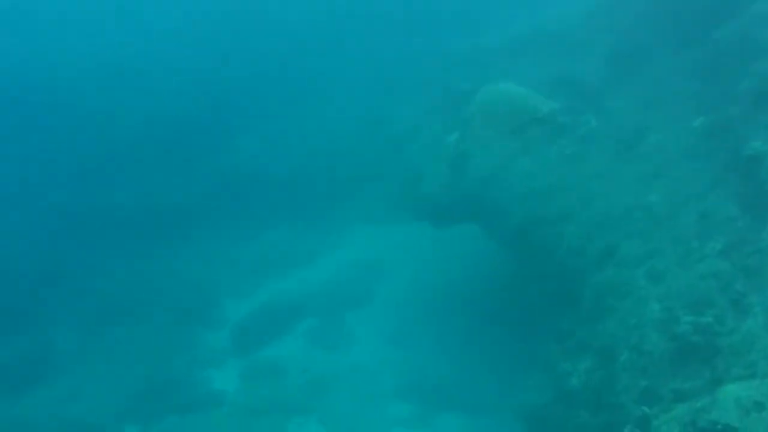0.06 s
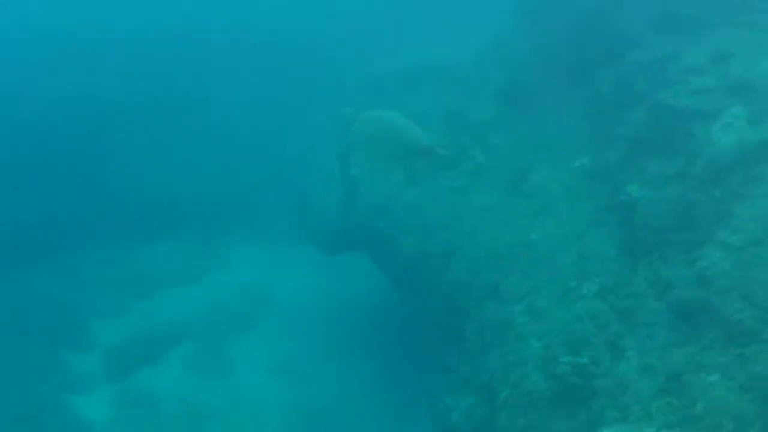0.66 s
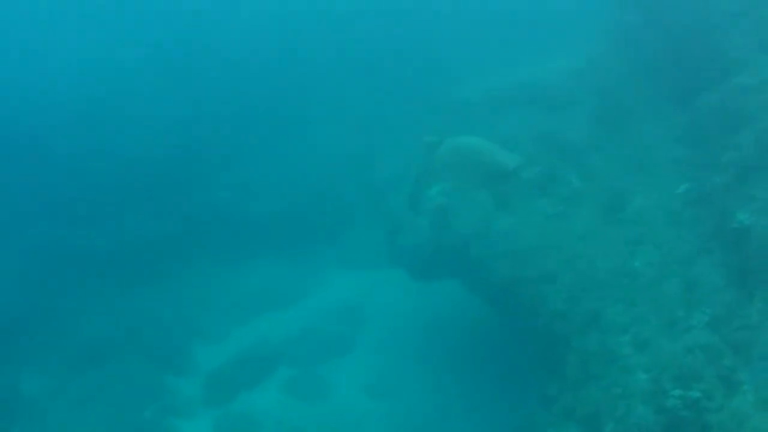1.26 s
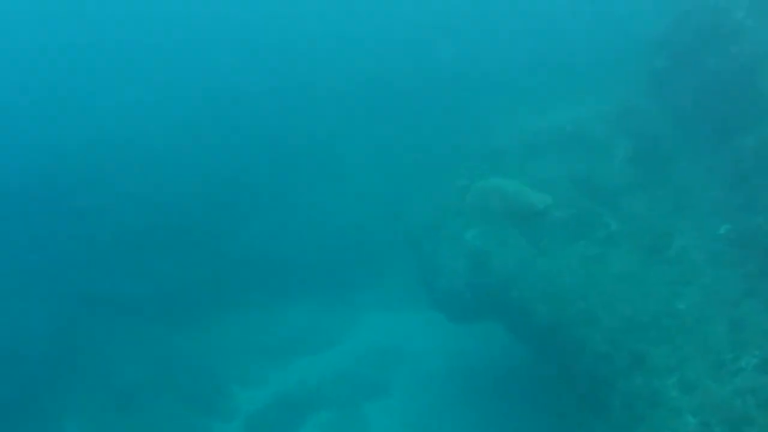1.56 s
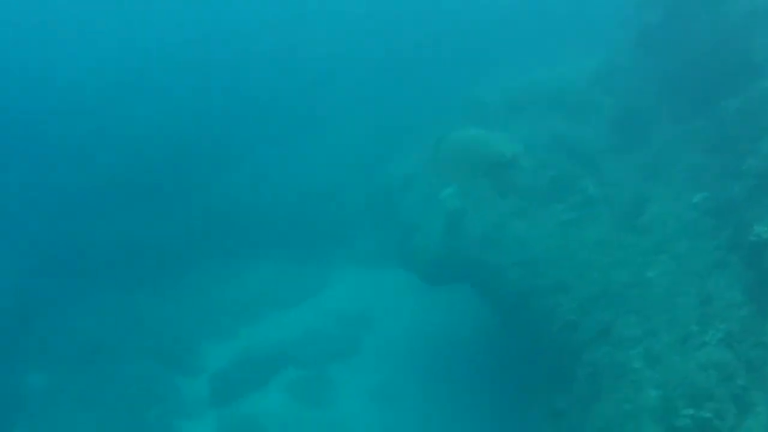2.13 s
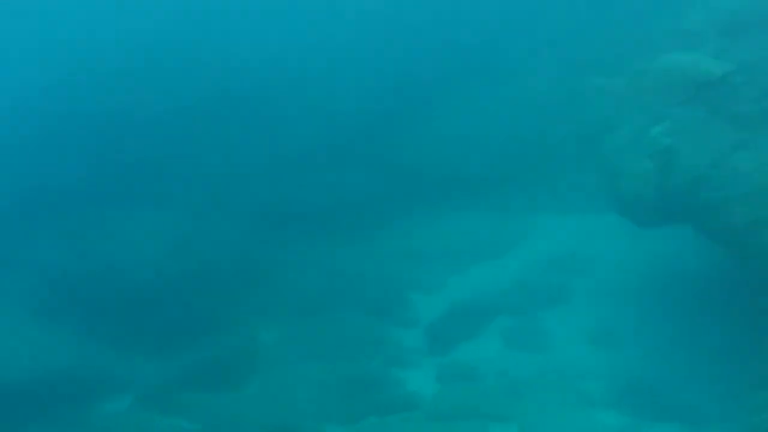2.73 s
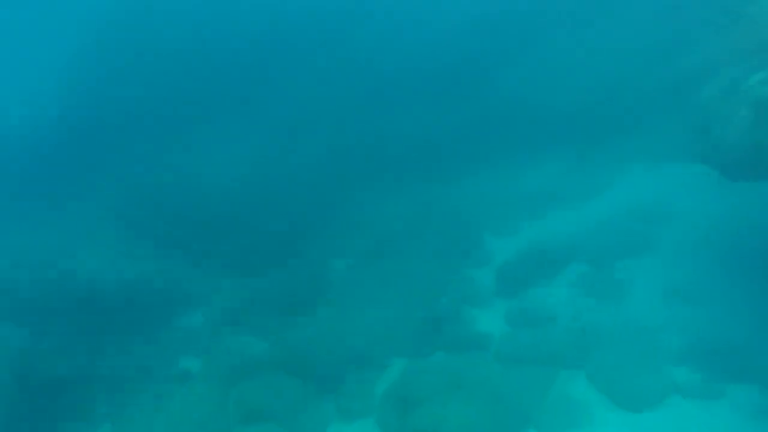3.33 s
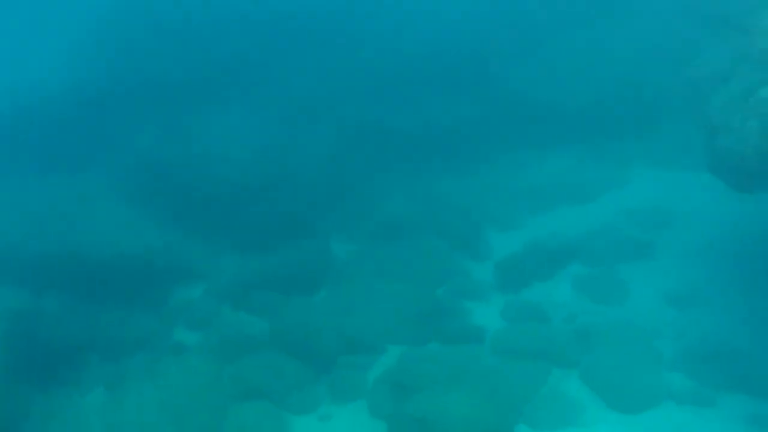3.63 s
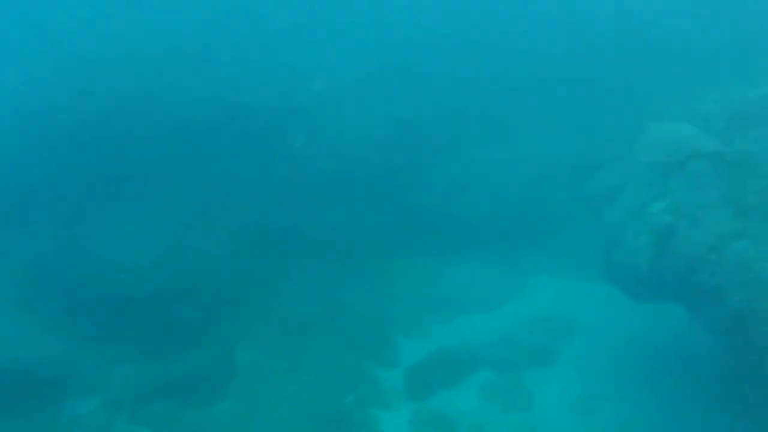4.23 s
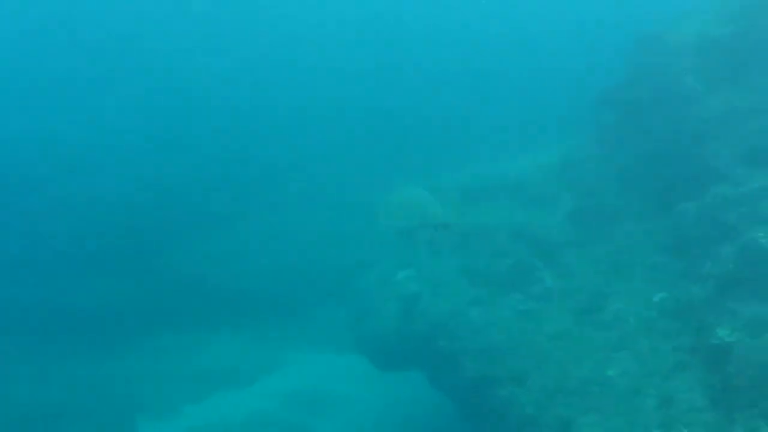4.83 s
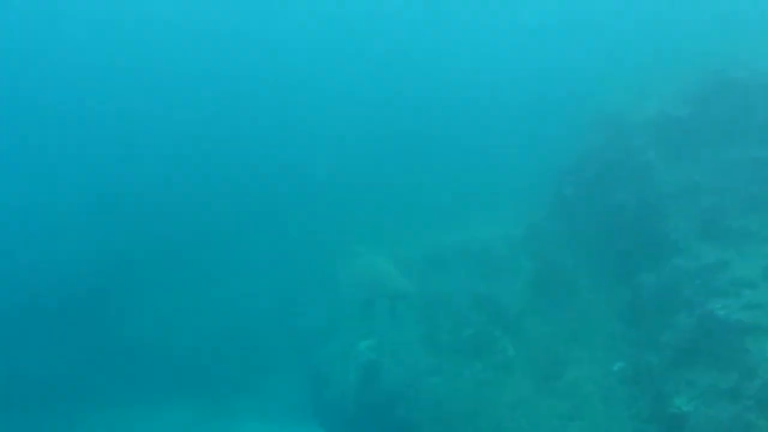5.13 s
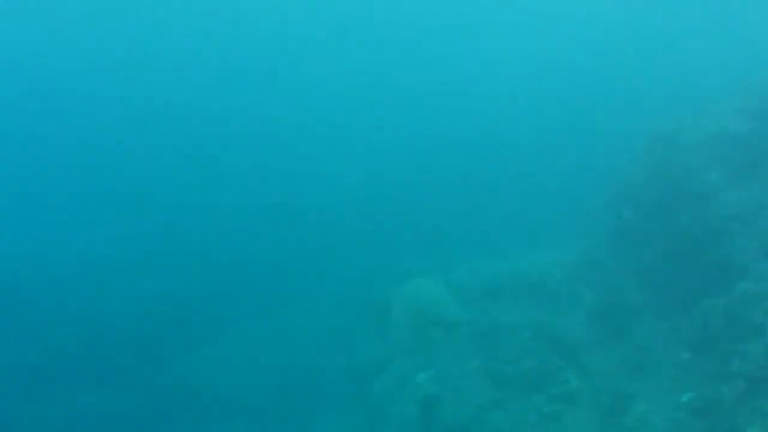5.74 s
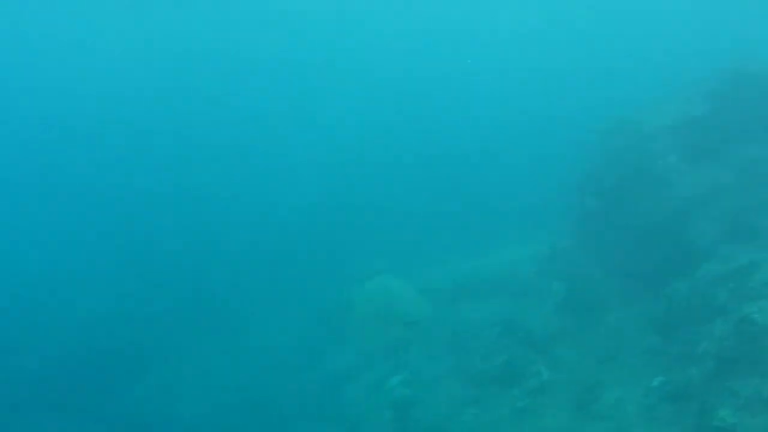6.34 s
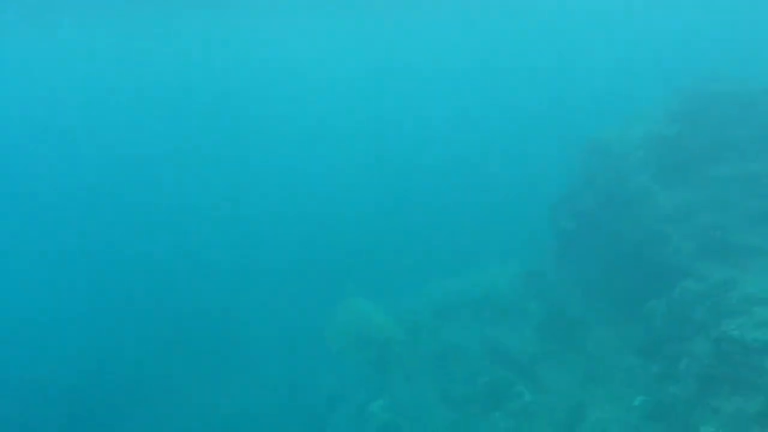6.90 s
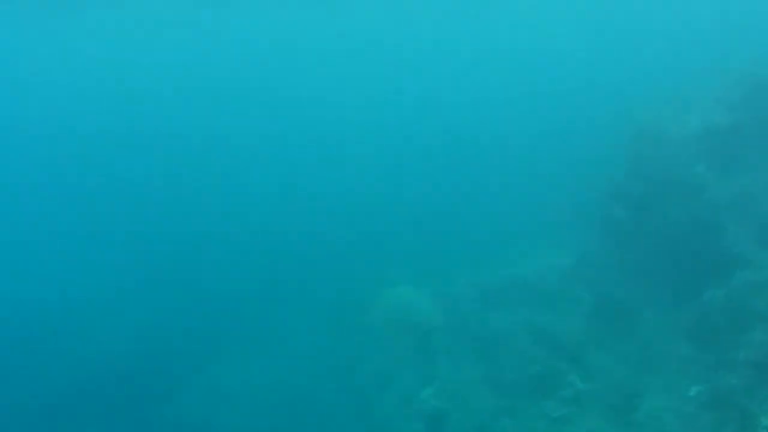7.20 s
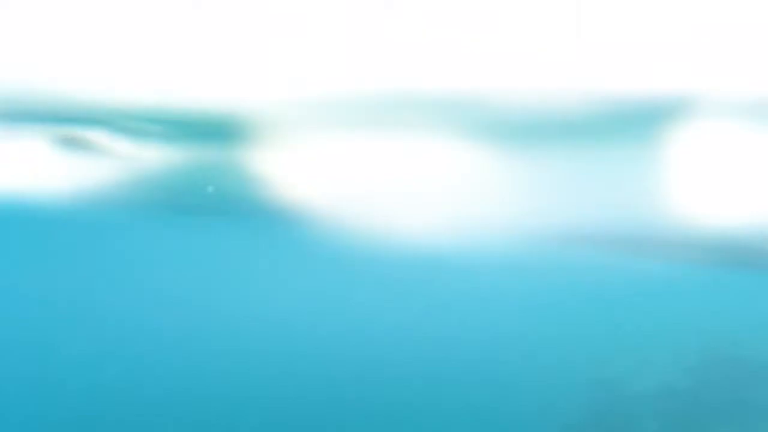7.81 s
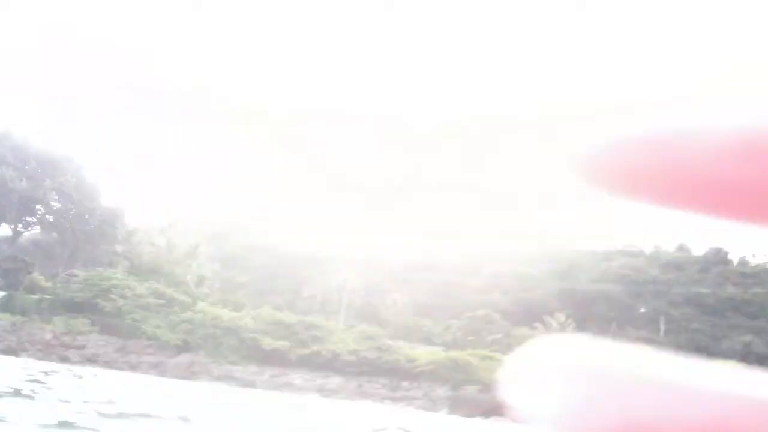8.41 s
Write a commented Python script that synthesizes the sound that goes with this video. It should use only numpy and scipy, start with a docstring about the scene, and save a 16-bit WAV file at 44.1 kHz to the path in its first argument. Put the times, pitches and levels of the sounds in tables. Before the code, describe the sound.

Quiet shrimp clicks, watery hiss and small gurgles on a reef, ending in a few sharp, hollow knocks and splashes at the surface.

```python
"""A camera in a waterproof case drifts over a reef. Snapping shrimp crackle near and far, their clicks
smeared by rock and ringing in the case; water rumbles and swirls past, bubbles blip, air pockets glug.
From 2.3 s water knocks on the case now and then. Near 7.8 s it rises through the surface: the crackle
fades, waves slap the case, water gulps around it and drops tick on it."""
import sys
import numpy as np
from scipy import signal
from scipy.fft import rfft, irfft
from scipy.io import wavfile

SR = 44100
rng = np.random.default_rng(int(sys.argv[2]) if len(sys.argv) > 2 else 0)


def inscribe(sig):
    """Save sig as 16-bit PCM at rate SR to the path in sys.argv[1].

    A 1-D sig is mono; a 2-D sig holds one channel per row.
    Samples are clipped to [-1, 1] before scaling.
    """
    pcm = np.round(np.clip(np.atleast_2d(sig).T, -1, 1) * 32767)
    wavfile.write(sys.argv[1], SR, pcm.astype(np.int16))


N = 381906
HIT_SAMPLES = 4096
RISE_FROM_S, RISE_TO_S = 7.76, 7.95   # the case breaks the surface

# hollow ring of the case: freq_hz, level_db
CASE_SPECTRUM = [(60, -45), (350, -14.5), (800, -2), (1150, -5.5), (1600, 4), (1920, 4), (2400, -17.5),
                 (2950, -13), (3600, -34.5), (6000, -38), (16000, -96)]


def from_db(db):
    """Decibels to gain."""
    return 10 ** (np.asarray(db) / 20)


def rms_one(x):
    """Scale to rms 1."""
    return x / np.sqrt(np.mean(x ** 2) + 1e-20)


def in_time(rows):
    """Each column after time_s, interpolated per sample."""
    time_s, *columns = np.transpose(rows)
    return [np.interp(np.arange(N) / SR, time_s, column) for column in columns]


def add(out, start_s, sound):
    """Mix a sound in at start_s."""
    i = int(np.clip(start_s * SR, 0, N - 1))
    out[i:i + len(sound)] += sound[:N - i]


def wander(count):
    """Glide through count random values over the scene."""
    return np.interp(np.linspace(0, count - 1, N), np.arange(count), rng.standard_normal(count))


def coloured(x, spectrum, vary_db=0):
    """Minimum-phase filter, spectrum points jittered by vary_db; output rms 1."""
    size = 2 * HIT_SAMPLES
    hz, db = np.transpose(spectrum)
    db = db + vary_db * rng.standard_normal(len(db))
    shape_db = np.interp(np.log(np.arange(size // 2 + 1) * SR / size + 1), np.log(hz), db)
    cepstrum = irfft(np.log(from_db(shape_db)))
    cepstrum[1:size // 2] *= 2
    cepstrum[size // 2 + 1:] = 0
    response = irfft(np.exp(rfft(cepstrum)))[:HIT_SAMPLES]
    return rms_one(signal.oaconvolve(x, response)[:len(x)])


def noise(spectrum):
    """Steady coloured noise, rms 1."""
    return coloured(rng.standard_normal(N), spectrum)


def swelling(swell_s):
    """Envelope: peaks at 1 after swell_s, then decays."""
    age = np.arange(2 * HIT_SAMPLES) / SR / swell_s
    return age * np.exp(1 - age)


def briefer(level_db, halving_db, gentle_db=-40):
    """Length factor, 1 at gentle_db: violent motion is spent sooner."""
    return 2 ** ((gentle_db - level_db) / halving_db)


def scattered(clicks):
    """Rough rock smears each click over about 1 ms, rippling its spectrum."""
    smear = swelling(swell_s=0.00022)[:HIT_SAMPLES // 32]
    return signal.lfilter(smear * rng.standard_normal(len(smear)), 1, clicks)


def far_shrimp(per_s, spread_db, surge_db, paths=6):
    """Distant snaps arrive along differently coloured paths and merge into a surging, frying hiss."""
    # distant crackle: freq_hz, level_db
    far_spectrum = [(530, -26), (900, -2), (1290, -5.5), (1590, 5), (1850, 0), (2000, -1.5), (2360, -15),
                    (3000, -7), (3590, -11), (4740, 1), (7060, 0.5), (8980, -5.5), (12400, -19.5),
                    (14500, -26), (16000, -72.5)]
    sizes = from_db(spread_db * np.minimum(rng.exponential(1, N), 4)) * rng.choice([-1, 1], N)
    clicks = sizes * (rng.random(N) < per_s / SR)
    path = rng.integers(0, paths, N)
    crackle = sum(coloured(scattered(clicks * (path == k)), far_spectrum) for k in range(paths))
    hiss = from_db(-1) * noise(far_spectrum)
    return rms_one((rms_one(crackle) + hiss) * from_db(surge_db * wander(count=400)))


def pulse(rattle_db, rattle_t60_s, echo_db, echo_t60_s):
    """Pressure spike, its rattle in the case, and scattered echoes from rock and surface."""
    t = np.arange(HIT_SAMPLES) / SR
    rattle = rng.standard_normal(HIT_SAMPLES) * from_db(-60 * t / rattle_t60_s)
    echoes = rng.standard_normal(HIT_SAMPLES) * rng.exponential(1, HIT_SAMPLES)
    echoes *= from_db(-60 * t / echo_t60_s)
    tail = from_db(rattle_db) * rms_one(rattle) + from_db(echo_db) * rms_one(echoes)
    return (t == 0) + tail / np.sqrt(HIT_SAMPLES)


def crack_colour(tilt_db_per_khz, peak_hz, hump_db=9, hump_octaves=0.28, beside_db=-3.5):
    """Spectrum of one crack: tilted, with a hump at its own pitch."""
    # base crack: freq_hz, level_db
    crack_spectrum = [(300, -63), (2300, -21), (3000, -4), (3700, -6.5), (4700, 3.5), (5600, 0.5),
                      (6500, 1.5), (7500, -0.5), (9000, -5), (11000, -16.5), (13000, -28), (16000, -41)]
    hz, db = np.transpose(crack_spectrum)
    hump = np.exp(-(np.log2(hz / peak_hz) / hump_octaves) ** 2)
    return np.transpose([hz, db + tilt_db_per_khz * hz / 1000 + beside_db + hump_db * hump])


def strike(push, crack_db, ring_db, crack_spectrum, ring_spectrum, vary_db):
    """A pulse passes through the case as a bright crack and a hollow ring; levels as rms over 20 ms."""
    crack = from_db(crack_db) * coloured(push, crack_spectrum, vary_db)
    ring = from_db(ring_db) * coloured(push, ring_spectrum, vary_db)
    return np.sqrt(0.02 * SR / HIT_SAMPLES) * (crack + ring)


def colony(per_s, crack_db, ring_db, spread_db, max_boost_db, tilt_db_per_khz, count):
    """Fainter shrimp snap at random; each path through the rocks has its own colour."""
    out, voices = np.zeros(N), []
    for far in np.linspace(0, 1, count) ** 2:
        push = pulse(rattle_db=-7.5, rattle_t60_s=0.0045, echo_db=2 + 13 * far, echo_t60_s=0.075)
        colour = crack_colour(tilt_db_per_khz * rng.uniform(-0.85, 1), peak_hz=rng.uniform(5000, 8400))
        snap = strike(push, crack_db - 5 * far, ring_db + 8 * far, colour, CASE_SPECTRUM, vary_db=5)
        voices.append(snap)
    candidates = rng.random((900, 4))
    for when, size, who, chance in candidates:
        if chance < per_s * N / SR / len(candidates):
            boost_db = min(-spread_db * np.log(size), max_boost_db)
            add(out, when * N / SR, from_db(boost_db) * voices[int(who * count)])
    return out


def flow(buffet_db):
    """Water rumbles unevenly past the case."""
    # rumble: freq_hz, level_db
    flow_spectrum = [(20, -40), (45, -24), (80, -8), (140, 0), (200, -2), (300, -7), (600, -7.5),
                     (1500, -58.5), (16000, -67)]
    return rms_one(noise(flow_spectrum) * from_db(buffet_db * wander(count=200)))


def bubble(pitch_hz, swell_s, glide):
    """An air pocket swells into ringing and decays, its pitch rising slightly."""
    t = np.arange(HIT_SAMPLES) / SR
    rise = 1 + glide * np.tanh(t / swell_s / 10)
    return swelling(swell_s)[:HIT_SAMPLES] * np.sin(2 * np.pi * pitch_hz * t * rise)


def gurgle(wash_db, surge_db):
    """Flurries of small, mixed bubbles over a wash of stirred water."""
    # stirred water: freq_hz, level_db
    wash_spectrum = [(100, -17), (300, -9), (450, -0.5), (700, 6), (1100, -8), (1600, 1.5), (3000, -15),
                     (16000, -31)]
    blips = np.zeros(N)
    for when, draw_a, draw_b, loud, slow in rng.random((1100, 5)):
        pitch_hz = 290 * 4.8 ** ((draw_a + draw_b) / 2)   # middling sizes are commonest
        blip = bubble(pitch_hz, swell_s=0.00077 + 0.0067 * slow, glide=0.01)
        add(blips, when * N / SR, from_db(10 * loud) * blip)
    wash = from_db(wash_db) * noise(wash_spectrum)
    return rms_one((rms_one(blips) + wash) * from_db(surge_db * wander(count=110)))


def swirls(gentle_swell_s, halving_db):
    """Short turbulent rushes of band noise; louder ones are briefer."""
    # swirls of water: start_s, centre_hz, peak_rms_db, half_width_ratio
    rushes = [(.02, 597, -59.5, 0.58), (.772, 1450, -47, .45), (.805, 1500, -50, 0.28),
              (1.188, 990, -57, 0.38), (1.66, 1170, -49, 0.49), (2.74, 600, -57.5, 0.4),
              (2.88, 1260, -55, 0.25), (3.015, 1100, -54, 0.27), (3.06, 880, -51, 0.48),
              (3.115, 640, -51.5, 0.46), (3.787, 690, -49.5, 0.75), (4.59, 716, -54.5, 0.35),
              (4.446, 656, -45.5, 1), (5.013, 730, -42.5, 0.37), (5.877, 1200, -36, 0.34),
              (6.069, 1600, -52.5, 0.48), (6.931, 1060, -49.5, 0.71), (6.975, 990, -48, 0.42),
              (8.2835, 1980, -13, 0.28), (8.29, 2880, -19, 0.42), (8.3485, 2540, -32, 0.58),
              (8.353, 1860, -21, 0.35), (8.3623, 2180, -21, 0.46), (8.395, 1680, -43, 0.37),
              (8.4296, 2070, -36, 0.56), (8.433, 2000, -28.5, 0.5), (8.447, 900, -30, 0.99),
              (8.606, 1140, -41, 0.4), (8.616, 1100, -33, 0.4)]
    out = np.zeros(N)
    for start_s, centre_hz, level_db, width in rushes:
        edges_hz = [centre_hz / (1 + width), centre_hz * (1 + width)]
        band = signal.butter(3, edges_hz, "band", fs=SR, output="sos")
        rush = rms_one(signal.sosfilt(band, rng.standard_normal(2 * HIT_SAMPLES)))
        envelope = swelling(gentle_swell_s * briefer(level_db, halving_db))
        add(out, start_s, from_db(level_db) * envelope * rush)
    return out


def single_bubbles(gentle_swell_cycles, halving_db):
    """Bubbles that stand out singly; gentle ones ring for more cycles."""
    # ringing bubbles: start_s, pitch_hz, peak_db
    blips = [(.035, 592, -50), (.07, 613, -45.5), (.095, 750, -44.5), (.12, 1200, -51), (.147, 695, -52),
             (.267, 1030, -47), (.311, 1040, -48), (.325, 636, -46.5), (.396, 4620, -30.5),
             (.467, 654, -47.5), (.472, 2840, -38), (.564, 1580, -34), (.894, 645, -38.5),
             (.945, 640, -50.5), (1.0, 496, -54), (1.1, 773, -46), (1.127, 575, -55), (1.195, 704, -44),
             (1.235, 368, -52), (1.342, 670, -39), (1.395, 725, -41.5), (1.412, 973, -47.5),
             (1.463, 545, -47), (1.523, 532, -50.5), (1.53, 718, -37.5), (1.58, 689, -49),
             (1.614, 695, -45), (2.21, 767, -45.5), (3.792, 618, -46.5), (4.596, 677, -47),
             (5.8697, 1660, -22.5), (5.8714, 933, -29), (6.926, 377, -47), (6.985, 580, -41.5),
             (7.098, 687, -45), (7.166, 1740, -33.5), (7.8924, 2250, -22.5), (8.3945, 528, -18.5),
             (8.4035, 396, -21), (8.43, 720, -32)]
    out = np.zeros(N)
    for start_s, pitch_hz, peak_db in blips:
        swell_s = gentle_swell_cycles / pitch_hz * briefer(peak_db, halving_db)
        add(out, start_s, from_db(peak_db) * bubble(pitch_hz, swell_s, glide=0.02))
    return out


def near_shrimp():
    """Single snaps; hollower ones come from farther off and carry more echo."""
    # loudest snaps: start_s, crack_db, ring_db, tilt_db_per_khz, pitch_hz
    snaps = [(.0585, -51.5, -69, 1, 6700), (.3541, -49, -55, 0, 6300), (.4677, -49.5, -53.5, -1, 5460),
             (.4968, -58, -56.5, -6, 4600), (.5128, -56.5, -71, -2, 4800), (.7181, -45.5, -61, -0.7, 5100),
             (.9863, -47, -52.5, -1, 6250), (1.0082, -54, -57, 1.5, 5200), (1.2113, -55.5, -57, 0, 5500),
             (1.2462, -57, -63.5, 1, 6000), (1.3733, -51.5, -42, 0.5, 5400), (1.5417, -49, -57.5, -1, 4600),
             (1.6669, -49, -54, .5, 6100), (1.8847, -44.5, -56.5, 0, 6800), (1.9054, -54.5, -57, -1, 5600),
             (2.067, -57, -74, 2, 7000), (2.125, -55, -59.5, 0, 6000), (2.1462, -56.5, -57, -1, 6000),
             (2.2389, -47.5, -63, 1, 5350), (2.327, -52.5, -56, 0, 5000), (2.3515, -51.5, -56.5, 3, 6900),
             (2.5547, -48.5, -54, .3, 7000), (2.589, -54, -50.5, 0.5, 5000), (2.666, -57, -56, -5, 4600),
             (2.782, -57.5, -74, 1.5, 7500), (2.9644, -55.5, -58.5, 1, 6500), (2.9928, -56.5, -72, 1, 5100),
             (3.05, -53.5, -48.5, 0.5, 5900), (3.1104, -51, -53.5, 0, 6060),
             (3.198, -54.5, -42.5, 1.5, 7000), (3.332, -54, -55, -2.5, 5660),
             (3.4296, -50, -50, -0.5, 7660), (3.4412, -60, -65, 1, 6300), (3.461, -55.5, -64, -1, 5000),
             (3.494, -64, -47, 2, 5000), (3.5727, -47.5, -59, 2, 5770), (3.606, -53.5, -53, -1.5, 5800),
             (3.6201, -54.5, -51, -6, 5000), (3.9222, -51, -54, 1, 5270), (3.997, -73, -46, 0, 6000),
             (4.0974, -53.5, -57, 0, 6700), (4.1362, -58, -45.5, -3, 5000), (4.1528, -56, -59, 1, 6000),
             (4.1779, -41, -54.5, 2, 5600), (4.239, -58, -47, -1.5, 4700),
             (4.5111, -54.5, -56.5, 0.5, 5400), (4.525, -64, -66, 0, 6000), (4.5372, -49, -54, -0.8, 6900),
             (4.6589, -50.5, -64, 1.5, 8850), (4.8095, -51.5, -46.5, -.5, 5530),
             (4.8512, -53, -56.5, 0.5, 6200), (5.018, -78, -51.5, 0, 6000), (5.0598, -54.5, -59, 0, 4700),
             (5.091, -55, -60.5, 3.5, 7500), (5.1807, -51, -76, 0, 6660), (5.2527, -53, -58, -2, 6200),
             (5.356, -48, -47.5, -1.5, 4900), (5.3696, -57, -54.5, -0.5, 6500),
             (5.4125, -51, -66, 1.5, 5270), (5.7265, -51, -57.5, 0.5, 6940), (5.7358, -53, -70, -4, 6000),
             (5.7714, -52, -54, 0, 6300), (5.7942, -56, -73, .3, 6700), (5.8161, -45.5, -52, -0.2, 6550),
             (5.8706, -41.5, -31, -0.4, 7160), (5.9967, -54, -58.5, -.7, 6300),
             (6.111, -53.5, -58, -1, 5900), (6.1547, -54.5, -65, 0, 5400), (6.2366, -51.5, -62, 1.5, 6200),
             (6.3812, -56, -61, 1.5, 7000), (6.5301, -52.5, -76, 0, 6200), (6.587, -57, -43, -1, 5000),
             (6.6863, -53.5, -62, -.4, 5800), (6.958, -47.5, -46.5, -0.3, 5030),
             (7.019, -50.5, -54, -1.2, 4600), (7.0573, -54.5, -58, 0.5, 6800),
             (7.1563, -48, -56.5, 0.5, 8900), (7.2497, -53.5, -56, -1, 4800), (7.284, -52, -48.5, 0, 4700),
             (7.4054, -56.5, -85, 0.5, 5150), (7.5301, -43.5, -62, -0.5, 6340)]
    out = np.zeros(N)
    for start_s, crack_db, ring_db, tilt_db_per_khz, pitch_hz in snaps:
        far = np.clip((ring_db - crack_db + 9) / 12, 0, 1)
        push = pulse(rattle_db=0.5 + 1.2 * far, rattle_t60_s=0.0022 + 0.037 * far ** 2,
                     echo_db=-7.5 + 16 * far, echo_t60_s=0.071)
        colour = crack_colour(tilt_db_per_khz, pitch_hz)
        add(out, start_s, strike(push, crack_db, ring_db, colour, CASE_SPECTRUM, vary_db=2))
    return out


def glugs(faint_db, faint_hz, faint_count, gap_s, loss_db, spread_octaves, swell_cycles):
    """Each glug is a stumbling run of three large air pockets; fainter glugs come at random."""
    # low glugs around the case: start_s, pitch_hz, peak_db
    loud = [(.277, 169, -45.5), (.426, 150, -47.5), (1.48, 156, -44), (1.693, 185, -47), (1.726, 149, -47),
            (1.768, 133, -42.5), (2.088, 153, -49), (2.356, 160, -49), (2.561, 130, -49.5),
            (3.052, 152, -45), (3.128, 170, -49), (3.534, 160, -44), (4.386, 148, -47), (4.49, 161, -47),
            (5.54, 150, -47), (6.769, 222, -43.5), (6.847, 153, -45.5), (7.703, 188, -40.5),
            (7.76, 180, -45)]
    faint = [(when * N / SR, faint_hz * 2 ** (height - 0.5), faint_db - 6 * size)
             for when, height, size in rng.random((faint_count, 3))]
    out = np.zeros(N)
    for start_s, pitch_hz, peak_db in loud + faint:
        for k, (late, detune) in enumerate(rng.uniform(-0.76, 1, (3, 2))):
            pocket_hz = pitch_hz * 2 ** (spread_octaves * detune * (k + 0.5))
            pocket = bubble(pocket_hz, swell_cycles / pocket_hz, glide=0.084)
            add(out, start_s + gap_s * k * (1 + late / 2), from_db(peak_db - loss_db * k) * pocket)
    return out


def knocks(overtone_ratio, overtone_db, heave_ratio, heave_db):
    """Water presses on the case for a few cycles; a higher mode leads, hard knocks heave the case."""
    # knocks, hardest as waves close over the case: start_s, pitch_hz, peak_db, swell_cycles
    hits = [(2.3268, 340, -43.5, 0.44), (2.352, 252, -42, .55), (2.555, 336, -43, 0.37),
            (3.051, 300, -52, .45), (3.126, 300, -46, .45), (3.529, 270, -42.5, 0.54),
            (3.9167, 770, -24.5, 0.76), (6.8644, 840, -30.5, 0.71), (7.6584, 635, -29.5, 0.62),
            (7.871, 357, -35, .67), (7.8783, 1090, -17, 0.56), (7.8921, 352, -26.5, 0.63),
            (8.02, 250, -42, 0.92), (8.082, 453, -36, 0.93), (8.207, 270, -30, 0.52),
            (8.2831, 238, -2, .62), (8.2919, 260, -9, 0.48), (8.321, 380, -26, 0.53),
            (8.354, 280, -5.5, 0.66), (8.3629, 260, -17, 0.49), (8.43, 500, -9, 0.49),
            (8.447, 405, -23.5, 0.49), (8.505, 300, -40, 0.6), (8.5916, 191.5, 0, 0.74),
            (8.611, 250, -26, 0.56), (8.649, 230, -22.5, 0.56)]
    out, t = np.zeros(N), np.arange(2 * HIT_SAMPLES) / SR
    for start_s, pitch_hz, peak_db, swell_cycles in hits:
        swell_s = swell_cycles / pitch_hz
        phase = 2 * np.pi * pitch_hz * t
        thud = swelling(swell_s) ** 2 * np.sin(phase)
        slap = from_db(overtone_db) * swelling(swell_s / 2) ** 2 * np.sin(overtone_ratio * phase)
        heave = from_db(heave_db + peak_db / 4) * swelling(swell_s) ** 2 * np.sin(heave_ratio * phase)
        add(out, start_s, from_db(peak_db) * (thud + slap + heave))
    return out


def surface(lapping_top_hz, spatter_db):
    """Water laps dully at the case; each wave swells into low slosh, wet wash and spattering spray."""
    # lapping: time_s, slosh_db, spray_db
    lapping = [(7.55, -102, -94), (7.7, -54, -65), (7.85, -54.5, -59), (8.05, -56, -57.5),
               (8.27, -52, -56.5), (8.48, -65, -64)]
    # waves over the case: start_s, slosh_db, wash_db, spray_db, swell_s
    waves = [(7.865, -40, -62, -45, 0.0083), (8.285, -15, -18, -23, 0.0036), (8.298, -50, -54, -43, 0.017),
             (8.337, -26, -35, -55, 0.004), (8.344, -23, -34, -65, 0.0083), (8.383, -29.5, -43, -76, 0.021),
             (8.428, -24, -32, -54, 0.0067), (8.52, -82, -78, -64, 0.0098),
             (8.589, -20, -22.5, -21, 0.0044), (8.601, -50, -30.5, -81, 0.015),
             (8.631, -36, -61, -35, 0.012)]
    # colours of the three wave layers: freq_hz, level_db
    slosh_spectrum = [(20, -45), (90, -16), (160, 8), (260, 2), (480, -2), (750, -5), (1400, -31),
                      (4000, -59), (16000, -103)]
    wash_spectrum = [(100, -22), (650, 1.5), (1050, -10), (1600, -2), (2200, -15), (3000, -31), (6000, -29),
                     (16000, -79)]
    spray_spectrum = [(100, -37), (650, -1), (1200, 3), (2000, 3.5), (2800, -13.5), (5200, -6.5),
                      (9000, -11), (16000, -48)]
    lap_slosh, lap_spray = from_db(in_time(lapping))
    slosh, wash, spray = np.zeros((3, N))
    for start_s, slosh_db, wash_db, spray_db, swell_s in waves:
        for envelope, level_db in (slosh, slosh_db), (wash, wash_db), (spray, spray_db):
            add(envelope, start_s, from_db(level_db) * swelling(swell_s) ** 2)
    hiss = noise(spray_spectrum)
    dull_hiss = signal.sosfilt(signal.butter(1, lapping_top_hz, fs=SR, output="sos"), hiss)
    spatter = rms_one(hiss * from_db(spatter_db * wander(count=4000)))
    body = (lap_slosh + slosh) * noise(slosh_spectrum) + wash * noise(wash_spectrum)
    return body + lap_spray * dull_hiss + spray * spatter


def drops(droplet_db, spread_db, droplet_count):
    """Drops hit the case with a dry crack and thud; once in air, fine droplets tick on it at random."""
    # drop impacts: start_s, crack_db, thud_db
    impacts = [(7.6584, -72, -40.5), (7.6852, -81, -43), (7.879, -37, -32.5), (7.893, -76, -40.5),
               (7.9323, -50.5, -79), (8.259, -58, -76), (8.283, -69, -28.5), (8.2915, -39, -22),
               (8.2918, -28, -28), (8.3032, -43, -35), (8.317, -43.5, -48), (8.327, -51, -41),
               (8.3629, -24.5, -51), (8.4544, -46.5, -31.5), (8.4993, -40.5, -42), (8.593, -34.5, -34),
               (8.5964, -31, -29.5)]
    # colours of an impact: freq_hz, level_db
    crack_spectrum = [(300, -23), (2000, 1.5), (3400, -11.5), (4500, 2), (7500, -1.5), (9500, -10),
                      (12000, -17.5), (16000, -40)]
    thud_spectrum = [(60, -17), (250, -2.5), (650, 2.5), (1050, -3), (1700, 1), (2500, -9.5), (3500, -19.5),
                     (6000, -36), (16000, -75)]
    out = np.zeros(N)
    for start_s, crack_db, thud_db in impacts:
        push = pulse(rattle_db=-10, rattle_t60_s=0.0069, echo_db=-20, echo_t60_s=0.0097)
        add(out, start_s, strike(push, crack_db, thud_db, crack_spectrum, thud_spectrum, vary_db=1))
    tick_spectrum = crack_colour(tilt_db_per_khz=2.7, peak_hz=8100)
    for when, size in rng.random((droplet_count, 2)):
        level_db = droplet_db + spread_db * size ** 2
        push = pulse(rattle_db=-2, rattle_t60_s=0.005, echo_db=-19, echo_t60_s=0.012)
        tick = strike(push, level_db, level_db, tick_spectrum, CASE_SPECTRUM, vary_db=5)
        add(out, RISE_TO_S + when * (N / SR - RISE_TO_S), tick)
    return out


def rising(shrimp, low_hz, high_hz, surfaced_db):
    """The crackle's upper middle thins as the camera rises; all of it fades as the case surfaces."""
    # upper-middle band: time_s, gain_db
    band_curve = [(0, 8), (1.6, 3.5), (2.4, 5), (3.2, 1.5), (5.5, 4), (7.4, -3.5)]
    band_db, = in_time(band_curve)
    band = signal.sosfilt(signal.butter(1, [low_hz, high_hz], "band", fs=SR, output="sos"), shrimp)
    fade_db = np.interp(np.arange(N) / SR, [RISE_FROM_S, RISE_TO_S], [0, surfaced_db])
    return from_db(fade_db) * (shrimp + (from_db(band_db) - 1) * band)


def scene():
    """Mono mix of shrimp, moving water and splashes."""
    # steady reef, relative levels: time_s, crackle_db, flow_db
    reef = [(0.0, -65, -70.5), (0.47, -61.5, -70), (0.72, -60.5, -69), (1.2, -61, -76), (1.63, -58.5, -65),
            (2.0, -63, -70), (2.31, -62.5, -73), (2.67, -61, -70), (3.62, -58, -70.5), (4.36, -62, -66.5),
            (5.19, -59.5, -70), (5.65, -58.5, -70), (5.97, -64, -69), (6.35, -58, -69),
            (6.71, -61.5, -68.5), (7.39, -57.5, -65), (7.6, -64.5, -67.5)]
    # stirred water, relative level: time_s, gurgle_db
    stirring = [(0.0, -56), (1.25, -57), (1.56, -53.5), (1.76, -63.5), (1.97, -64), (2.16, -61),
                (2.79, -73), (3.41, -58), (3.81, -62.5), (4.06, -59), (4.44, -65), (4.64, -64.5),
                (5.54, -63), (5.84, -66), (6.79, -66), (7.07, -55), (7.37, -73.5), (7.6, -64.5)]
    crackle_db, flow_db = in_time(reef)
    gurgle_db, = in_time(stirring)
    shrimp = from_db(crackle_db) * far_shrimp(per_s=1100, spread_db=11.5, surge_db=3)
    shrimp += colony(per_s=42, crack_db=-67, ring_db=-70.5, spread_db=5.5, max_boost_db=7,
                     tilt_db_per_khz=2.7, count=90)
    water = from_db(gurgle_db + 1.87) * gurgle(wash_db=0.5, surge_db=4)
    water += from_db(flow_db + 4.5) * flow(buffet_db=1.5)
    water += glugs(faint_db=-54.5, faint_hz=193, faint_count=30, gap_s=0.00893, loss_db=9.5,
                   spread_octaves=0.69, swell_cycles=0.6)
    water += swirls(gentle_swell_s=0.0038, halving_db=8.5)
    water += single_bubbles(gentle_swell_cycles=3.34, halving_db=21.5)
    water += knocks(overtone_ratio=2.48, overtone_db=-9, heave_ratio=0.52, heave_db=-19.5)
    splashes = surface(lapping_top_hz=3400, spatter_db=8.5)
    splashes += drops(droplet_db=-80, spread_db=12.5, droplet_count=44)
    crackle = rising(shrimp + near_shrimp(), low_hz=2070, high_hz=3180, surfaced_db=-20)
    return (crackle + water + splashes)[None]


def record(dry):
    """Soft clipping rounds the hardest knocks; a steep low-pass cuts the top."""
    ceiling, stopband_hz = 0.96, 17000
    lowpass = signal.cheby2(14, 70, stopband_hz, fs=SR, output="sos")
    return signal.sosfilt(lowpass, ceiling * np.tanh(dry / ceiling))


dry = scene()
out = record(dry)
inscribe(out)
```